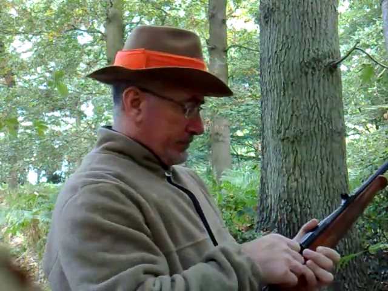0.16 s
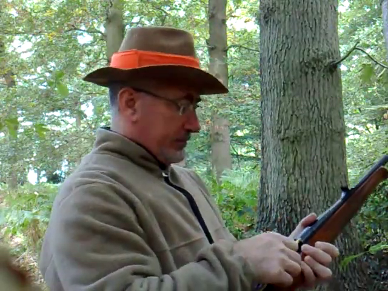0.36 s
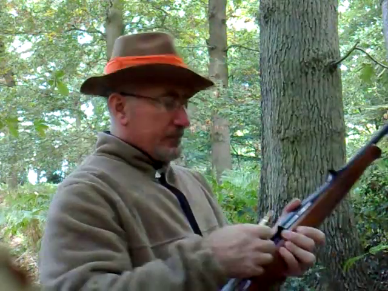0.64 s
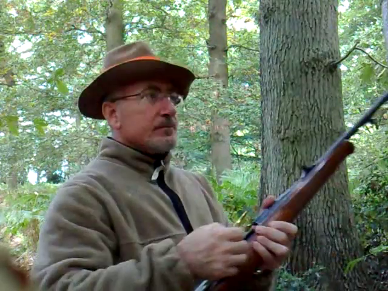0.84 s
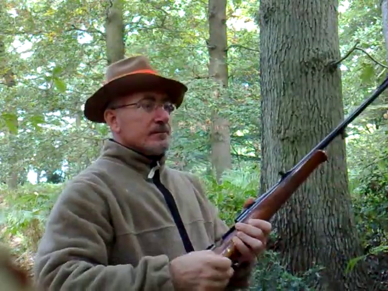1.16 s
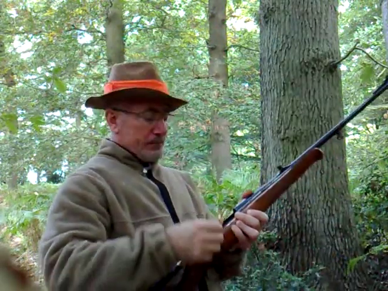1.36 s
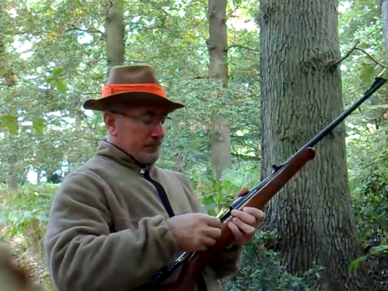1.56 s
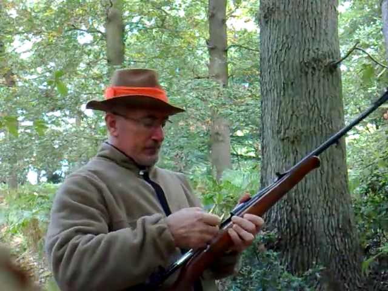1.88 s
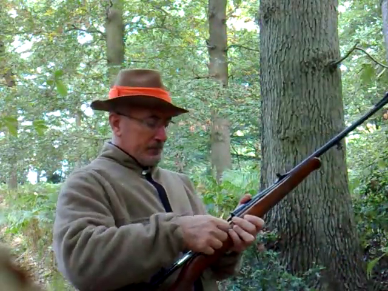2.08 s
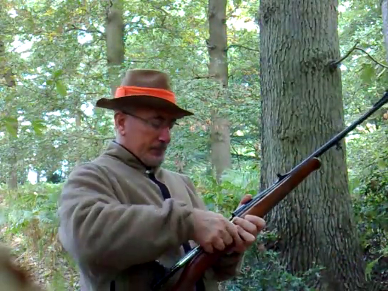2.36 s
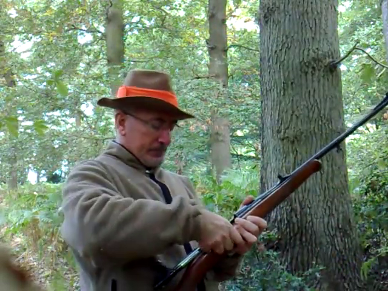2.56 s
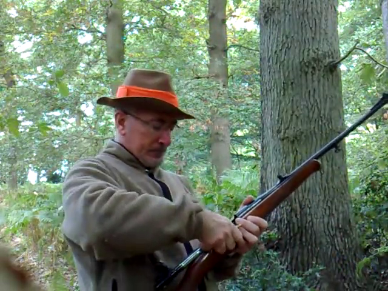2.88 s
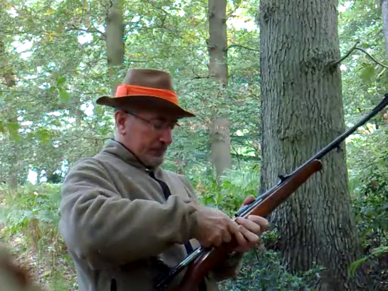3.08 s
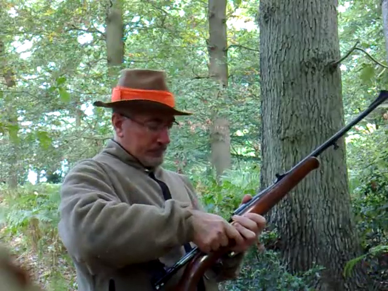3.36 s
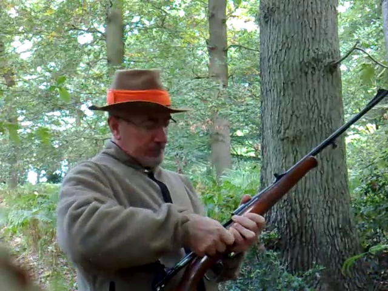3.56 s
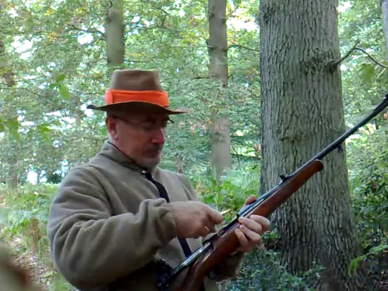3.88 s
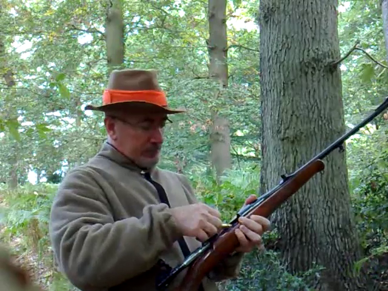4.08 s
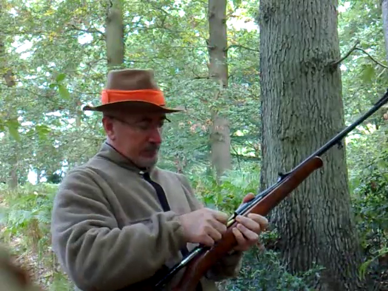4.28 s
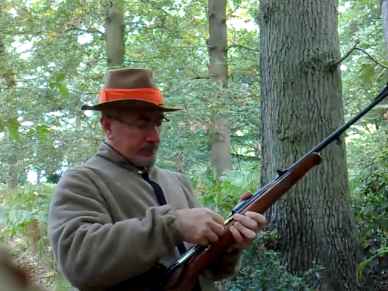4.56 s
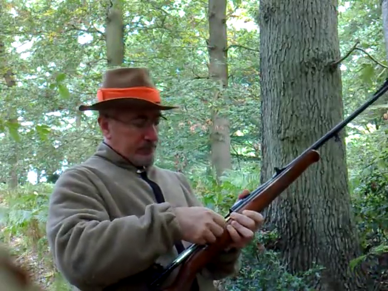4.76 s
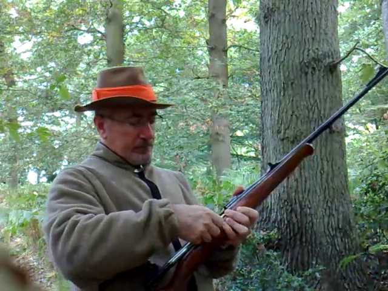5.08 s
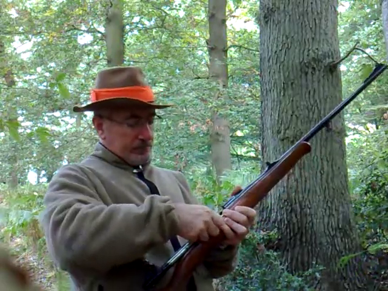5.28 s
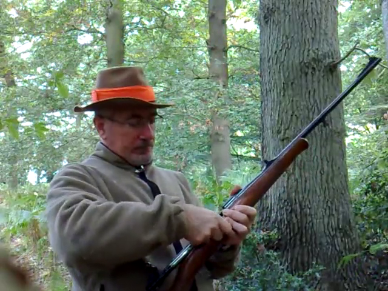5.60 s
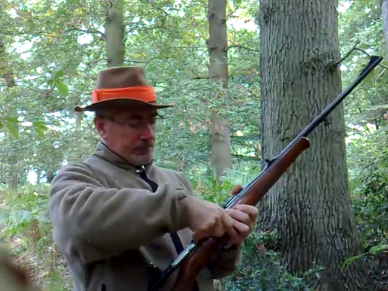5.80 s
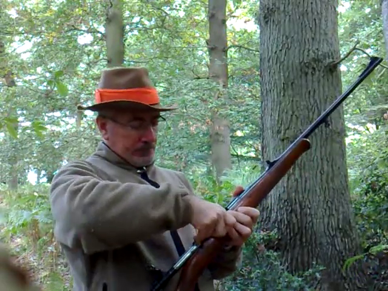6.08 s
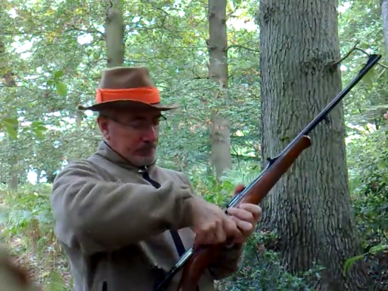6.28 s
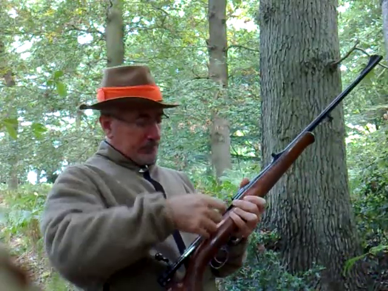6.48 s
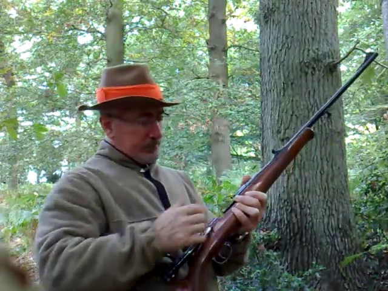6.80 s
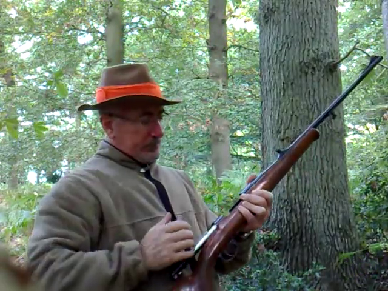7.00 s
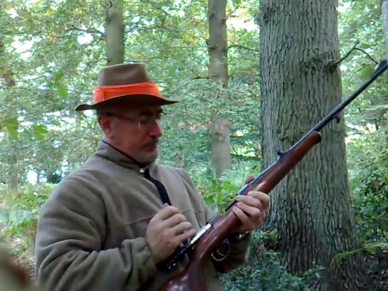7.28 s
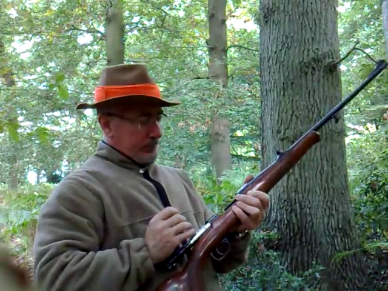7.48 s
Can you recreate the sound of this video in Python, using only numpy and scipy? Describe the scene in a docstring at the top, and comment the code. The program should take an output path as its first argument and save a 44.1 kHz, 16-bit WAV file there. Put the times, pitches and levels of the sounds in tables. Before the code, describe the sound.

Dry, close metallic clicks of cartridges going into a wooden-stocked rifle, in irregular clusters with quiet gaps. Wind thumps the microphone early, cloth brushes before the first loud clack, then very sharp snaps follow. A loose case ticks and rings in the middle, one strong click lands later, and a double clack closes. Soft forest hiss and a faint tree echo surround it.

```python
"""In a wood, a hunter thumbs cartridges into the magazine of a bolt-action rifle, two metres away.
Noise bursts of contact excite resonances of wooden stock, steel action and brass case; trunks echo them.
Fleece rustles as grainy noise strokes; wind buffets the microphone as fluttering low noise and short pulses.
Leaves hiss as steady coloured noise; a faint hum and thin bird calls are smeared, gliding tones.
The loudest peaks clip and the treble ends at 16 kHz."""
import sys
import numpy as np
from scipy import signal
from scipy.fft import rfft, irfft
from scipy.io import wavfile
from scipy.ndimage import uniform_filter1d

SR = 44100
rng = np.random.default_rng(int(sys.argv[2]) if len(sys.argv) > 2 else 0)


def store_pcm(level_fs):
    """Save levels as 16-bit WAV."""
    pcm = np.round(np.clip(level_fs, -1, 1) * 32767).astype(np.int16)
    wavfile.write(sys.argv[1], SR, np.atleast_2d(pcm).T)


N = 336924
T = np.arange(N) / SR


def amp(db):
    """Decibel law: the amplitude gain of a level in dB."""
    return 10 ** (np.asarray(db) / 20)


def curve(rows):
    """Linear interpolation: the columns of a time table, sample by sample."""
    s, *columns = np.transpose(rows)
    return [np.interp(T, s, column) for column in columns]


def coloured(x, colour):
    """Spectral shaping: x filtered to a (pitch_hz, level_db) curve on a log pitch axis, rms 1."""
    hz, db = np.transpose(colour)
    bin_hz = np.arange(N // 2 + 1) * SR / N
    gain = amp(np.interp(np.log(bin_hz + 1), np.log(hz), db))
    y = irfft(rfft(x) * gain, N)
    return y / y.std()


def walk(rate_hz):
    """Slow random modulation: random levels held for 1 / rate_hz, smoothed twice, standard deviation 1."""
    hold = int(SR / rate_hz)
    steps = np.repeat(rng.standard_normal(N // hold + 1), hold)
    y = uniform_filter1d(uniform_filter1d(steps, hold), hold)[:N]
    return y / y.std()


def add(track, s, x):
    """Superposition: mix x into track from s seconds on."""
    i = max(int(s * SR), 0)
    track[i:i + len(x)] += x[:N - i]


def tone(rows, smear_rate_hz, rough):
    """Narrow-band modulation: a gliding tone, part steady and part randomly modulated (share rough)."""
    hz, db = curve(rows)
    inside = 1. * (T > rows[0][0]) * (T < rows[-1][0])
    gate = uniform_filter1d(inside, SR // 20)  # 50 ms fades at both ends
    random_phasor = (walk(smear_rate_hz) + 1j * walk(smear_rate_hz)) / np.sqrt(2)
    smear = (1 - rough) + rough * random_phasor
    carrier = np.exp(2j * np.pi * np.cumsum(hz) / SR)
    return gate * np.sqrt(2) * amp(db) * np.real(smear * carrier)


def hum():
    """Narrow-band noise: a faint distant hum, its steady phase almost lost to smearing."""
    # pitch and level of the hum: start_s, pitch_hz, level_db
    hum_glide = [(2.0, 688, -78), (2.6, 680.4, -61.5), (4.1, 691, -67.5), (5.0, 692, -57),
                 (5.9, 688, -74.5)]
    return tone(hum_glide, smear_rate_hz=25., rough=0.99)


def birds():
    """Frequency glide: thin bird calls, each a falling tone smeared by distance."""
    # one table for each call: start_s, pitch_hz, level_db
    calls = [
        [(4.63, 7050, -62), (4.9, 6750, -75)],
        [(7.02, 6880, -65.5), (7.3, 6760, -69), (7.64, 6700, -70)],
    ]
    return sum(tone(call, smear_rate_hz=150.0, rough=0.99) for call in calls)


def leaves():
    """Broadband noise: the canopy hisses evenly, swelling a little."""
    # spectrum of the hiss: pitch_hz, level_db (relative, per Hz)
    leaf_colour = [(88, -21), (150, -6), (361, -13), (637, -14), (689, -14.5), (871, -16.5), (1630, -18),
                   (4950, -27), (6770, -31.5), (7620, -31), (16000, -32)]
    level_db = -53.5 + 0.26 * walk(1.9)
    return amp(level_db) * coloured(rng.standard_normal(N), leaf_colour)


def wind_rumble():
    """Turbulent pressure: eddies on the microphone rumble in fluttering bands, brighter in gusts."""
    # strength of the wind, a gain on the rumble: start_s, level_db
    gusts = [(0.0, -37), (0.5, -33), (0.72, -33), (0.9, -34.5), (1.5, -35.5), (1.72, -39), (2.23, -40.5),
             (3.05, -36), (3.35, -43), (3.75, -37), (4.3, -44.5), (4.5, -34), (4.74, -45), (5.34, -37.5),
             (5.8, -41.5), (6.06, -39.5), (6.79, -41.5), (7.3, -47.5), (7.64, -54)]
    # spectrum of the rumble: pitch_hz, level_db (relative, per Hz)
    wind_colour = [(8.8, -36), (15, -11), (43, -0.5), (81, 8), (142, -9.5), (231, -28.5), (305, -29.5),
                   (350, -39.5), (420, -30), (550, -56), (920, -120)]
    gust_brightens = 0.55  # dB per band upward, for each dB of wind over -40
    db, = curve(gusts)
    rumble, flutter, out = coloured(rng.standard_normal(N), wind_colour), walk(35), 0
    for step, edges_hz in enumerate([(12, 90), (90, 180), (180, 420)]):
        band = signal.sosfilt(signal.butter(2, edges_hz, "band", fs=SR, output="sos"), rumble)
        brightness_db = step * gust_brightens * (db + 40)
        # one flutter is common to the bands and deeper in the upper ones; another is each band's own
        flutter_db = (1.8 + .8 * step) * flutter + 1.6 * walk(22)
        out = out + band * amp(brightness_db + flutter_db)
    return out * amp(db)


def wind_buffets():
    """Pressure pulses: single eddies thump the microphone as cosines under a Gaussian envelope."""
    # middle and size of each pulse: centre_s, peak_db, pitch_hz
    buffets = [(0.157, -22, 84.5), (0.351, -23, 108), (0.393, -22, 98), (0.529, -24, 81),
               (0.769, -17.5, 121), (0.865, -12.5, 162), (2.06, -29, 75), (3.652, -21, 96.7),
               (5.862, -27, 82), (6.15, -27.5, 110)]
    width_cycles = 1.41  # between the points 20 dB down
    out = np.zeros(N)
    t = T[:SR // 8] - 1 / 16  # seconds from the middle of the pulse
    for s, peak_db, hz in buffets:
        envelope = amp(peak_db - 20 * (t * hz / width_cycles * 2) ** 2)
        add(out, s + t[0], envelope * np.cos(2 * np.pi * hz * t))
    return out


def fleece():
    """Friction noise: rubbing cloth swells and fades as dense grains of uneven size; one stroke whistles."""
    # brush strokes, either end first: start_s, end_s, level_db (at the crest, nominal)
    strokes = [(.17, 0.28, -57), (.55, 2.8, -60.5), (.68, 0.87, -48), (0.878, 1.01, -56),
               (1.049, 1.145, -47), (1.15, 1.33, -50), (1.34, 1.47, -48.5), (1.46, 1.588, -39),
               (1.581, 1.72, -41.5), (1.68, 1.84, -40), (1.8, 1.75, -63)]
    # spectrum of the rubbing: pitch_hz, level_db (relative, per Hz)
    cloth_colour = [(300, -39.5), (600, -4), (1500, -4.5), (3500, -4.5), (5000, -7.5), (5700, -4.5),
                    (6500, -10.5), (12000, -11), (16000, -21.5)]
    # whistle of one stroke: start_s, pitch_hz, level_db
    swish = [(.74, 5840, -62), (.775, 5700, -51), (.83, 5700, -60)]
    stroke = sum(amp(db) * np.sin(np.pi * np.clip((T - a) / (b - a), 0, 1)) for a, b, db in strokes)
    grains = rng.standard_normal(N) * amp(2.0 * walk(900) + 1.74 * walk(130))
    return stroke * coloured(grains, cloth_colour) + tone(swish, smear_rate_hz=570.0, rough=1.0)


def burst(t60, t):
    """Impact excitation: a sharp strike and a dying burst of tiny contacts, t60 in seconds."""
    strike_db, strike_t60_s = -2, 0.0052
    contact_spread_db = 2.5
    size = rng.standard_normal(len(t)) * amp(contact_spread_db * rng.standard_normal(len(t)))
    return size * (amp(strike_db - 60 * t / strike_t60_s) + amp(-60 * t / t60))


def shake(db, t):
    """Residual vibration: the longer, weaker noise of loose parts settling."""
    t60_s = 0.12
    return rng.standard_normal(len(t)) * amp(db - 60 * (t / t60_s) ** 1.176)


def ring(modes, t60, favour_hz, t):
    """Modal resonance: contacts and shaking drive modes, louder near the favoured pitch; peak 1."""
    favour_db, favour_octaves = 12, 0.11  # greatest boost, and its reach in pitch
    scatter_db, shake_db = 2.5, -29.5  # random spread of the modes from blow to blow; drive by loose parts
    hz, width, db = np.transpose(modes)[:, :, None]
    f = np.arange(len(t) // 2 + 1) * SR / len(t)
    near = np.exp(-(np.log2(hz / favour_hz) / favour_octaves) ** 2)
    scatter = scatter_db * rng.standard_normal((len(modes), 1))
    strength = amp(db + favour_db * near + scatter)
    resonances = strength / (1 + 1j * (f / hz - hz / (f + 1)) * hz / width)
    # a soft contact cannot drive much above the highest mode
    body = resonances.sum(0) / (1 + 1j * f / hz.max()) ** 2
    drive = burst(t60, t) + shake(shake_db, t)
    y = irfft(rfft(drive) * body, len(t))
    return y / np.abs(y).max()


def rattles():
    """Repeated impact: a loose case rolls in the magazine well, in soft, dull knocks at uneven gaps."""
    # spells of rolling: start_s, end_s, peak_db
    rolls = [(4.7, 4.788, -31.5), (5.004, 5.046, -28.5)]
    gap_s, spread_db = .024, 2.5
    hard_db, t60_s, favour_hz = -51, 0.076, 1380
    rows = []
    for a, b, db in rolls:
        for s in np.arange(a, b, gap_s):
            late_s = .5 * gap_s * rng.random()
            peak_db = db + spread_db * rng.standard_normal()
            rows.append((s + late_s, peak_db, hard_db, t60_s, favour_hz))
    return rows


def rifle():
    """Struck resonators: cartridge knocks on magazine ring stock, steel and brass over a bright crack."""
    # blows: start_s, peak_db, hardness_db (gain of crack over stock), t60_s (of clatter), favoured_hz
    knocks = [(0.226, -33, 11, .04, 2980), (0.4244, -30, -23, 0.037, 1500),
              (0.6212, -21.5, 1.5, .022, 4130), (0.6352, -23, -6, 0.025, 3630),
              (0.645, -28.5, -16, 0.066, 4180), (0.8997, -21.5, -5, 0.047, 1635),
              (0.9168, -16.5, 8.5, 0.049, 4140), (0.9268, -25.5, -2, 0.024, 1020),
              (1.0755, -25, 8.5, 0.067, 4640), (1.4093, -26.5, 6, 0.011, 4940),
              (1.5195, -18.5, 16, .033, 5760), (1.5756, -25.5, -20, 0.075, 1190),
              (1.6094, -20, -34, .042, 1400), (1.624, -12, -4, 0.15, 3000), (1.6324, -4, -0.5, 0.024, 2950),
              (1.6369, -6.5, -8, 0.081, 1290), (1.6472, -1, -3, 0.057, 1400),
              (1.6894, -16.5, 4.5, 0.02, 1610), (2.3249, -10.5, -27, 0.14, 2300),
              (2.334, -3, 6, 0.019, 1440), (2.3377, 1.5, 7, .05, 4200), (2.3497, -3, 2.5, 0.043, 1440),
              (2.4034, -9.5, -13, 0.041, 3200), (2.4526, -27.5, -30, .033, 1360),
              (2.4925, -29.5, -35, 0.055, 2210), (2.5361, -18.5, -9, 0.0062, 3400),
              (2.558, -32, -17, .03, 3300), (2.581, -3, -3, 0.021, 3320), (2.9957, -26.5, -9, .03, 3400),
              (3.006, -19.5, -18, 0.14, 2060), (3.011, 2.5, 11, 0.024, 5320),
              (3.2152, -33.5, -23, .03, 2100), (3.2269, -17, -33, .02, 1070),
              (4.419, -26, -30, 0.096, 1350), (4.4889, -12, -1, .054, 3130),
              (4.5036, -20.5, -19, 0.14, 3240), (4.5984, -38, -14, 0.015, 4820),
              (4.6503, -21.5, -2, 0.036, 4820), (4.6887, -27.5, -14, 0.13, 4670),
              (4.8247, -24.5, -13, 0.059, 2090), (4.8286, -12.5, 2, 0.037, 4900),
              (4.8476, -25, -30, 0.064, 1290), (4.9175, -32, -10, .039, 2260),
              (4.9582, -14, -8, 0.029, 4590), (4.9823, -18, -22, 0.067, 2110),
              (5.0586, -21.5, -22, 0.058, 2190), (5.0678, -17.5, -14, 0.094, 4800),
              (5.085, -14.5, 19, 0.052, 5050), (5.541, -34.5, -10.5, 0.021, 3260),
              (5.6037, -25.5, -43, 0.065, 1500), (5.616, -31.5, -14, 0.013, 3630),
              (5.633, -31, -28, .08, 1500), (5.6452, 0, 2.5, .018, 1950), (5.689, -29.5, -24, .04, 2060),
              (6.0454, -25.5, -28, 0.019, 1290), (6.275, -29.5, -2, .014, 3540),
              (6.333, -36, -11, 0.021, 3600), (6.497, -38, -18, 0.021, 2100),
              (6.543, -28, -38, 0.066, 1216), (6.5789, -23, -24, 0.065, 1250),
              (6.601, -9, -17.5, 0.016, 1320), (7.3996, -13, 4.5, 0.027, 3400),
              (7.4145, -16.5, -20, .025, 1440), (7.434, -11, -4, 0.038, 1430),
              (7.4509, -20, -41, 0.047, 1480), (7.4609, -22, -46, 0.077, 1520)]
    # modes of the wooden stock: pitch_hz, width_hz, level_db (relative)
    stock = [(650, 100, -29), (1072, 67, -7.5), (1267, 80.3, -5), (1450, 219, 3.5), (1931, 450, -2.5),
             (2092, 150, -1.5)]
    # modes of the steel action: pitch_hz, width_hz, level_db (relative)
    steel = [(2920, 180, -11.5), (3240, 220, 5.5), (3580, 403, 0.5), (4255, 350, 0), (5030, 500, 0.5),
             (5600, 170, -11)]
    # mode of the brass case: pitch_hz, width_hz, level_db (relative to the steel)
    brass = [(4830, 70, 12)]
    loose_from_s, loose_to_s = 4.45, 5.08  # a loose case rings with the steel until it is seated
    crack_hz, crack_top_hz, crack_t60_share = 6600, 12600, 0.56
    shake_hz, shake_db = 2450, -21.5  # loose parts hiss above this pitch
    build_s = .0008
    out, t = np.zeros(N), T[:8192]
    crack_band = np.vstack([signal.butter(2, crack_hz, "high", fs=SR, output="sos"),
                            signal.butter(1, crack_top_hz, fs=SR, output="sos")])
    hiss_band = signal.butter(2, shake_hz, "high", fs=SR, output="sos")
    for s, peak_db, hard_db, t60, hz in knocks + rattles():
        # harder and higher blows bring out the steel over the stock
        steel_db = 3.5 + 0.29 * hard_db + 5 * np.log2(hz / 2000)
        crack = signal.sosfilt(crack_band, burst(crack_t60_share * t60, t))
        crack = crack + signal.sosfilt(hiss_band, shake(shake_db, t))
        metal_modes = steel + brass if loose_from_s < s < loose_to_s else steel
        metal = ring(metal_modes, t60, hz, t)
        hit = ring(stock, t60, hz, t) + amp(steel_db) * metal + amp(hard_db) * crack
        hit = hit * (1 - np.exp(-t / build_s)) ** 2  # the contact takes a moment to build
        add(out, s, hit * amp(peak_db) / np.abs(hit).max())
    return out


def trunks(x):
    """Diffuse scattering: dense echoes from the trees swell in after the direct sound and decay."""
    level_db, late_s, t60_s = -33, .03, .4
    t = T[:SR // 3]
    echo = rng.standard_normal(len(t)) * amp(-60 * t / t60_s) * (1 - np.exp(-t / late_s))
    return amp(level_db) * signal.fftconvolve(x, echo / np.linalg.norm(echo))[:N]


def scene():
    """Superposition: all sources at one microphone."""
    background = hum() + birds() + leaves()
    wind = wind_rumble() + wind_buffets()
    knocks = rifle()
    return (background + wind + fleece() + knocks + trunks(knocks))[None]


def record(dry):
    """Saturation and band limiting: the loudest peaks clip, then a steep low-pass cuts the top."""
    top_hz = 16000
    low_pass = signal.ellip(10, .2, 75, top_hz, fs=SR, output="sos")
    return signal.sosfilt(low_pass, np.clip(dry, -1, 1))


dry = scene()
out = record(dry)
store_pcm(out)
```